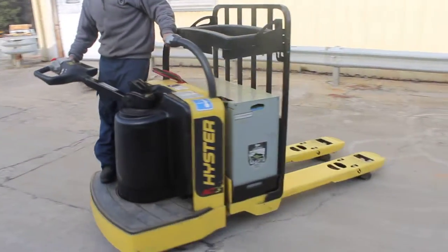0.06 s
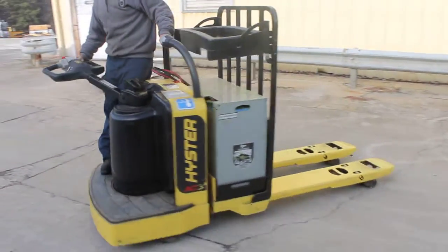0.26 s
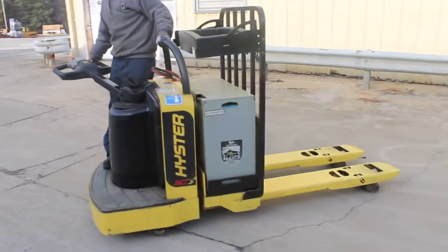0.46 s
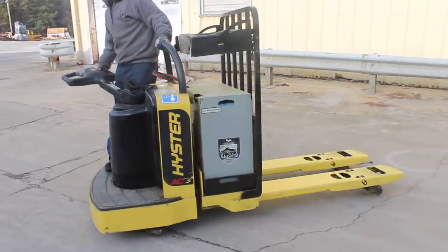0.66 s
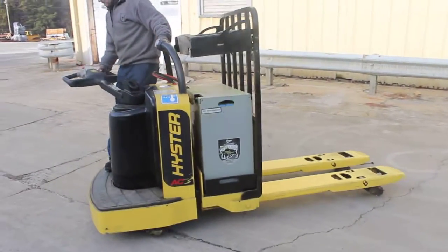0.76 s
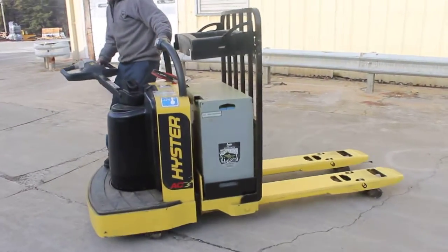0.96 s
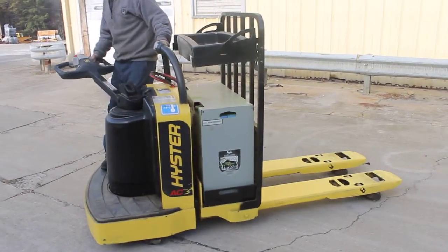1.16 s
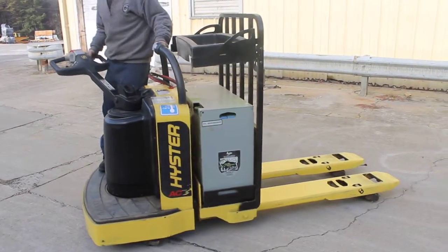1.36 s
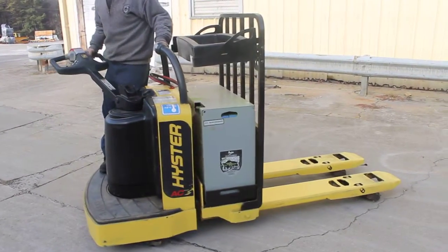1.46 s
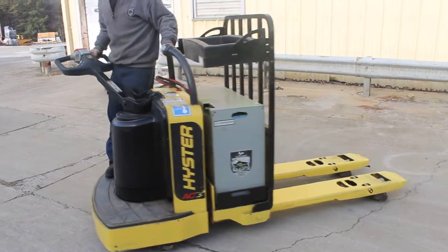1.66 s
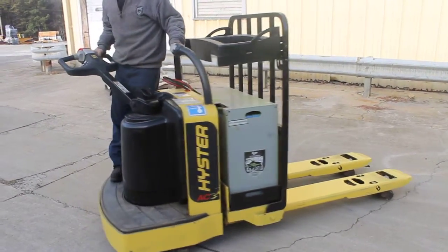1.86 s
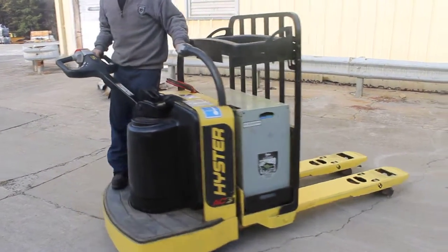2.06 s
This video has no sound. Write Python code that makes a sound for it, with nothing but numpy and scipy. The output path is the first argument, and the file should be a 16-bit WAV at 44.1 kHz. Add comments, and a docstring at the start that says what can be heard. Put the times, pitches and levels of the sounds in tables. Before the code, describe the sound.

Electric pallet jack rolling over cracked concrete, its empty steel forks slamming and rattling with metallic clanks

```python
"""Tyre rumble, a gritty hiss and a faint whine come first, outdoors on cracked concrete, a few metres off.
An electric pallet jack rolls by one microphone: shaped noise for the tyres, wavering tones for the drive.
Wheels thud in the joints and panels shudder: dying tones and noise. The lift linkage clacks, the empty
steel forks slam and the backrest bars jangle: noise bursts and washes over ringing partials."""
import sys
import numpy as np
from scipy import signal
from scipy.fft import rfft, irfft, next_fast_len
from scipy.io import wavfile
from scipy.ndimage import uniform_filter1d, map_coordinates

SR = 44100
rng = np.random.default_rng(int(sys.argv[2]) if len(sys.argv) > 2 else 0)


def transcribe(signal):
    """Save signal, clipped to [-1, 1], as a 16-bit WAV file at the path in sys.argv[1]."""
    frames = np.atleast_2d(signal).T
    limited = np.clip(frames, -1, 1)
    pcm = np.round(limited * 32767).astype(np.int16)
    wavfile.write(sys.argv[1], SR, pcm)


N = 92610
T = np.arange(N) / SR  # time of each sample, s


def amp(db):
    """Decibels to gain."""
    return 10 ** (np.asarray(db) / 20)


def unit(x):
    """x at rms 1."""
    return x / np.sqrt(np.mean(x ** 2) + 1e-20)


def along(points, hz):
    """Interpolate (frequency, value) points on a log frequency axis."""
    f, v = np.transpose(points)
    return np.interp(np.log(hz + 1), np.log(f + 1), v)


def curves(rows):
    """One value per sample for each column after the time."""
    s, *cols = np.transpose(rows)
    return [np.interp(T, s, c) for c in cols]


def wobble(rate, size=N):
    """A smooth random curve, rate knots a second."""
    knots = rng.standard_normal(4096)
    return map_coordinates(knots, [T[:size] * rate], mode="wrap")


def sine(hz, t=T, phase=0):
    """A pure tone, with a phase offset in radians."""
    return np.sin(2 * np.pi * hz * t + phase)


def noise(colour, pitch=1, treble_db=0, size=N):
    """Coloured noise of rms 1, shifted in pitch; treble_db tilts it per tenfold of (1 + kHz)."""
    hz = np.fft.rfftfreq(size, 1 / SR)
    gain = amp(along(colour, hz / pitch) + treble_db * np.log10(hz / 1000 + 1))
    phases = np.exp(2j * np.pi * rng.random(len(hz)))
    return unit(irfft(gain * phases, size))


def envelope(attack, hold, t60, size=N):
    """Rise with time constant attack; after hold, release by 60 dB in t60 (all s)."""
    rise = 1 - np.exp(-T[:size] / attack)
    return rise * amp(-60 * np.maximum(T[:size] - hold, 0) / t60)


def burst(colour, attack, t60, pitch=1, treble_db=0):
    """A short dying burst of coloured noise, scaled to the energy of its envelope."""
    shape = envelope(attack, 0, t60, size=2 ** 13)
    x = noise(colour, pitch, treble_db, size=len(shape)) * shape
    return x * np.linalg.norm(shape) / np.linalg.norm(x)


def ring(modes, attack, blur, flutter_db=0, pitch=1, size=2 ** 15):
    """Dying partials, unsteady in level (flutter_db) and phase (blur, radians)."""
    t = T[:size]
    out = np.zeros(size)
    for hz, db, t60 in modes:
        level = amp(db + flutter_db * wobble(69.7, size))
        out += level * envelope(attack, 0, t60, size) * sine(hz * pitch, t, blur * wobble(86.3, size))
    return out


def add(track, s, x):
    """Mix x into the track at time s."""
    i = max(round(s * SR), 0)
    track[i:i + len(x)] += x[:N - i]


def rattle():
    """Gain of rms near 1 that jumps at each random loose contact and falls back."""
    contacts_per_s, life_s, power_share = 410, 0.004, 0.42
    hits = (rng.random(N) < contacts_per_s / SR) * amp(3.9 * rng.standard_normal(N))
    power = signal.lfilter([1], [1, -np.exp(-1 / (life_s * SR))], hits)
    power = 1 - power_share + power_share * power / power.mean()
    return np.sqrt(power / uniform_filter1d(power, size=1200))  # evens out slow swells


def rolling():
    """Tyres on rough concrete: rumble, roar, steering scrub and a finely crackling hiss, all shaped noise."""
    # Rumble: (time [s], level before its trim [dB])
    rumble_levels = [(0, -47), (.2, -43.5), (.29, -39), (.35, -40.5), (.43, -38.5), (.52, -43.5),
                     (.65, -39.5), (.77, -43), (.86, -29.5), (1.0, -46.5), (1.15, -34.5), (1.3, -45.5),
                     (1.55, -42.5), (1.62, -45.5), (1.8, -47.5), (2.03, -44), (2.1, -37)]
    # Rolling: (time [s], roar level [dB], hiss level before its trim [dB])
    roll_levels = [(0, -34.5, -41), (0.08, -41, -43.5), (0.2, -39.5, -47), (0.31, -38.5, -44.5),
                   (0.42, -37, -45), (0.52, -38.5, -52.5), (0.7, -32, -57), (0.88, -41.5, -70),
                   (1.0, -45, -71.5), (1.1, -43, -56), (1.27, -37, -72), (1.6, -36.5, -72),
                   (1.9, -41, -53.5), (2.1, -41.5, -53)]
    # Tyre scrub while steering: (time [s], level [dB])
    scrub_levels = [(0.22, -85), (0.31, -53), (0.37, -41.5), (0.44, -39), (0.53, -44), (0.62, -100)]
    # Spectra of the four noises: (frequency [Hz], level [dB])
    rumble_colour = [(20, -16), (40, -3), (60, 2), (100, -2.5), (150, -2), (260, -2.5), (500, -26),
                     (1500, -58)]
    roar_colour = [(100, -17), (300, -1.5), (640, -0.5), (850, -5.5), (1200, -5.5), (1700, -9),
                   (2500, -17.5), (4000, -21), (8000, -32), (16000, -51)]
    hiss_colour = [(800, -28), (2500, -10), (5000, 0), (8000, 0), (12000, -1.5), (16000, -4.5)]
    scrub_colour = [(800, -4), (1900, 4), (4300, -4), (7000, -14), (16000, -34)]
    rumble_trim_db, hiss_trim_db = 2.5, -5.5
    (rumble_db,), (scrub_db,) = curves(rumble_levels), curves(scrub_levels)
    roar_db, hiss_db = curves(roll_levels)
    rumble = amp(rumble_db + rumble_trim_db) * noise(rumble_colour)
    roar = amp(roar_db + wobble(57.96)) * noise(roar_colour)
    hiss = amp(hiss_db + hiss_trim_db + 3.9 * wobble(460)) * rattle() * noise(hiss_colour)
    scrub = amp(scrub_db) * rattle() * noise(scrub_colour)
    return rumble + roar + hiss + scrub


def drive():
    """Thin, rough whines of the electric drive swell and fade; one climbs as the motor speeds up."""
    # (frequency at the swell [Hz], peak level [dB], time of swell [s], width [s], glide [Hz per s])
    whines = [(4920, -58, .13, .2, -5), (3390, -52, 2.0, 0.11, 3900)]
    out = np.zeros(N)
    for hz, db, s, width, glide in whines:
        t = T - s
        swell = np.exp(-(t / width) ** 2)
        roughness = hz / 4000 * wobble(220)  # radians
        out += amp(db) * swell * sine(hz + glide * t / 2, t, roughness)
    return out


def body():
    """Wheel knocks boom in the chassis modes, sharp at first; panels shudder as chattering noise."""
    # Wheel knocks on the chassis: (time [s], level [dB], t60 [s], pitch factor)
    knocks = [(0.006, -32, 0.051, 1.72), (0.2149, -22.5, 0.12, 0.94), (0.251, -17.5, 0.046, 1.01),
              (0.262, -26.5, 0.1, 1.07), (0.353, -16, 0.048, 1.01), (0.365, -24.5, 0.065, 0.79),
              (0.423, -29, 0.036, 1.16), (0.628, -16, 0.13, 1.06), (0.648, -17, 0.055, 1.3),
              (0.6885, -11.5, 0.043, 1.18), (0.754, -20, 0.065, 1.08), (0.769, -29, 0.093, 0.87),
              (1.044, -25.5, 0.19, 1.02), (1.167, -27, 0.07, 0.95), (1.18, -24.5, 0.072, 1.04),
              (1.218, -25, 0.04, 1.34), (1.304, -22, 0.24, 1.33), (1.338, -12, 0.04, 1.01),
              (1.343, -7.5, 0.02, 1), (1.362, -14.5, 0.055, 1.2), (1.406, -12, 0.047, 1.8),
              (1.538, -23, 0.073, 0.73), (1.555, -23, 0.1, 1.06), (1.776, -17, 0.055, 1)]
    # Chassis resonances: (frequency [Hz], level [dB], t60 as a multiple of the knock's)
    chassis_modes = [(519.5, -3.5, 0.72), (600.6, -5, 2.74), (664, -9, 1.14), (1006, -12.5, 2.8),
                     (1140, -9, 0.23)]
    # Spectrum of the unpitched thud: (frequency [Hz], level [dB])
    thud_colour = [(50, -31), (150, -19), (380, -19), (520, -8), (615, 5), (705, 0.5), (780, -12.5),
                   (1010, -7.5), (1250, -28), (1900, -21), (2600, -35), (6000, -55), (16000, -49)]
    # Panel shudder after each heavy blow: (time [s], level [dB], hold [s], t60 [s])
    shudders = [(0.606, -19, 0.015, 0.53), (1.335, -20.5, .2, 0.35), (1.708, -19.5, 0.028, 0.35)]
    # Spectrum of the panels: (frequency [Hz], level [dB])
    panel_colour = [(60, -44), (150, -15.5), (220, -12), (300, 1), (390, 0.5), (460, -6), (640, 1.5),
                    (800, -2.5), (1000, -3.5), (1190, -1.5), (1450, -9.5), (1650, -8.5), (2200, -12),
                    (5000, -39), (16000, -74)]
    sag_share, sag_s, thud_db = 0.048, 0.036, -2.5  # initial sharpness, its settling time, thud level
    out = np.zeros(N)
    t = T[:2 ** 13]
    for s, db, t60, pitch in knocks:
        bent_time = pitch * (t + sag_share * sag_s * (1 - np.exp(-t / sag_s)))
        boom = np.zeros(len(t))
        for hz, mode_db, life in chassis_modes:
            boom += amp(mode_db) * envelope(0.00038, 0, life * t60, len(t)) * sine(hz, bent_time)
        add(out, s, amp(db) * boom)
        add(out, s, amp(db + thud_db) * burst(thud_colour, 0.0012, t60, pitch))
    for s, db, hold, t60 in shudders:
        add(out, s, amp(db) * rattle() * envelope(0.00062, hold, t60) * noise(panel_colour))
    return out


def wheels():
    """Sharp noise ticks, dull bumps of low tone, tread slap and puff, and one faint falling squeak."""
    # Ticks: (time [s], level [dB], t60 [s])
    ticks = [(0.009, -30.5, 0.033), (0.123, -43, .015), (0.254, -35, .035), (0.435, -37, 0.033),
             (0.6812, -26.5, 0.024), (0.841, -37, 0.039), (0.971, -46.5, 0.086), (1.039, -42, 0.039),
             (1.2858, -17, 0.0073), (1.313, -25, .04), (1.3404, -23, 0.034), (1.35, -27, 0.043),
             (1.407, -22, 0.038), (1.484, -35, 0.026), (1.553, -34, .05), (1.6455, -14, 0.018),
             (1.915, -40, 0.059)]
    # Spectrum of a tick: (frequency [Hz], level [dB])
    tick_colour = [(1000, 6.5), (4000, 4), (7000, 2), (10000, -6.5), (16000, -14)]
    # Dull tyre bumps: (time [s], level [dB], frequency [Hz], t60 [s])
    bumps = [(0.277, -29, 148, 0.093), (0.717, -27, 125, .08), (0.809, -19, 109, 0.033),
             (0.8196, -18, 149, 0.081), (0.8462, -9, 125, 0.03), (0.867, -4.5, 152, 0.02),
             (0.9093, -12, 225.4, 0.022), (0.922, -24, 197, 0.078), (1.072, -30.5, 240, 0.16),
             (1.108, -23.5, 111, 0.12)]
    # Spectrum of the puff of noise in a bump: (frequency [Hz], level [dB])
    puff_colour = [(40, -18), (130, 4.5), (400, 5), (800, -24), (3000, -60)]
    # Wheel squeak: (time [s], frequency [Hz], level [dB])
    squeak_path = [(0.44, 3250, -68), (0.465, 3030, -37), (0.49, 2600, -64), (0.52, 2360, -34),
                   (0.535, 2330, -39)]
    bump_attack_s, puff_db = 0.0011, -9.5
    slap_db, slap_hz, slap_attack_s, slap_t60 = 3, 354, 0.006, 0.016  # the tread slapping down
    out = np.zeros(N)
    for s, db, t60 in ticks:
        add(out, s, amp(db) * burst(tick_colour, 0.00029, t60))
    hardest_db = max(row[1] for row in bumps)
    for s, db, hz, t60 in bumps:
        add(out, s, amp(db) * envelope(bump_attack_s, 0, t60) * sine(hz))
        slap_level_db = db + slap_db + (db - hardest_db) / 2  # softer bumps slap far less
        add(out, s, amp(slap_level_db) * envelope(slap_attack_s, 0, slap_t60) * sine(slap_hz))
        add(out, s, amp(db + puff_db) * burst(puff_colour, bump_attack_s, t60))
    hz, db = curves(squeak_path)
    sounding = (T > squeak_path[0][0]) & (T < squeak_path[-1][0])
    squeak = np.sin(2 * np.pi * np.cumsum(hz) / SR + 1.2 * wobble(210))
    return out + sounding * amp(db) * squeak


def linkage():
    """Slack joints clack shut as noise bursts over short partials; a loose pin pings after the slams."""
    # Clacks: (time [s], level [dB], ring relative to it [dB], burst t60 [s], pitch factor of the ring)
    clacks = [(0.5403, -18, -3, 0.11, 1.14), (1.028, -35, -2.5, .04, 0.92), (1.044, -32, -7, 0.08, .52),
              (1.139, -30, -10, 0.039, .6), (1.201, -36, 0.5, 0.057, 0.9), (1.212, -32.5, 2, 0.096, 1),
              (1.22, -25.5, -5, 0.075, 1.12), (1.273, -23, -4, 0.064, 0.5), (1.286, -7, -4.5, 0.048, 1.026),
              (1.3128, -15.5, -10.5, 0.06, 1.75), (1.325, -16.5, -13, 0.19, 1.02),
              (1.3401, -11, -9, 0.032, .72), (1.3586, -22.5, 1, 0.03, 1.5), (1.635, -16, -8, 0.17, 1.14),
              (1.659, -19, -12, 0.021, .66), (1.689, -21, -1, 0.017, 0.63)]
    # Spectrum of a clack: (frequency [Hz], level [dB])
    clack_colour = [(100, -45), (300, -18), (700, -27), (1200, 1.5), (1750, 0), (2350, 5.5), (2550, -18),
                    (2850, 7), (3300, -2.5), (4200, -2), (4900, -10.5), (6100, -9.5), (6700, -25.5),
                    (7400, -13), (8000, -26), (16000, -38)]
    # Partials of the linkage: (frequency [Hz], level [dB], t60 [s])
    link_modes = [(1285, -9, 0.029), (1794, -5.5, 0.055), (2262, 4, 0.097), (2906, 2.5, 0.029),
                  (3380, -4.5, 0.031), (3770, -4, 0.032), (4380, -14, 0.1), (5860, -25, 0.044)]
    # Pings of the pin: (time [s], level [dB])
    pings = [(0.722, -26.5), (1.675, -31), (1.698, -20.5), (1.819, -23)]
    # Spectrum of a ping: (multiple of its pitch, level [dB])
    ping_shape = [(.3, -25), (.57, -11.5), (.75, -30), (.92, -19), (1, -2.5), (1.06, -29), (1.15, -34),
                  (3, -51)]
    dull_db_per_db, hard_db = 2.2, -11  # clacks softer than hard_db lose treble
    ping_hz, ping_t60 = 4290, 0.08
    out = np.zeros(N)
    for s, db, ring_db, t60, pitch in clacks:
        treble_db = dull_db_per_db * min(db - hard_db, 0)
        add(out, s, amp(db) * burst(clack_colour, 0.0002, t60, treble_db=treble_db))
        tone = ring(link_modes, attack=0.00071, blur=0.33, pitch=pitch, size=2 ** 13)
        add(out, s, amp(db + ring_db) * tone)
    ping_colour = [(k * ping_hz, db) for k, db in ping_shape]
    for s, db in pings:
        add(out, s, amp(db) * burst(ping_colour, 0.00051, ping_t60))
    return out


def resonant(x):
    """x through the crowded resonances of the forks, of chance strength."""
    peak_db, spacing_hz = 3, 44.9
    hz = np.fft.rfftfreq(N, 1 / SR)
    peaks = map_coordinates(rng.standard_normal(4096), [hz / spacing_hz], mode="wrap")
    return unit(irfft(rfft(x) * amp(peak_db * np.tanh(peaks)), N))


def forks():
    """Each fork crashes down, rattles out with most of the treble dying first, and rings in its modes."""
    # Slams: (time [s], level of wash and crash before their trims [dB],
    # treble tilt of the wash [dB per tenfold of (1 + kHz)], length factor of the wash)
    slams = [(0.548, -13, -6, 0.88), (1.644, -15, -7, 1.12)]
    # Spectrum of a slam: (frequency [Hz], level [dB])
    slam_colour = [(60, -40), (150, -26), (270, -9), (430, -27), (620, -6.5), (780, -12.5), (1200, -3.5),
                   (1500, -4.5), (1850, -6.5), (2280, -5.5), (2540, -10.5), (2800, -5), (3750, -9.5),
                   (4300, -8.5), (4850, -16), (5450, -9), (6700, -19), (7300, -20.5), (11000, -28),
                   (16000, -40)]
    # Decay of the wash before the length factor: (frequency [Hz], t60 [s])
    slam_decay = [(200, 1), (1400, 0.57), (2800, 0.6), (4300, 0.5), (6000, 0.4), (14000, 0.4)]
    # Modes of the fork that slams first, then of the other: (frequency [Hz], level [dB], t60 [s])
    first_modes = [(802, -26, 0.91), (956, -28.5, 0.68), (1225, -18, 0.17), (1315, -15, 0.25),
                   (1570, -22, 0.55), (1630, -26, 0.47), (1794, -32, 0.34), (2370, -31, 0.68),
                   (2595, -37, 0.77), (3120, -25, 0.3), (4280, -28.5, 0.52), (5448, -28, 0.24),
                   (8600, -43, 0.29), (14700, -44, 0.34)]
    second_modes = [(944, -23, 0.43), (1228, -19.5, 0.25), (1287, -24, 0.62), (1406, -21, 0.4),
                    (1470, -19, 0.67), (1522, -23, 0.39), (1932, -7.5, 0.035), (2270, -19, 0.24),
                    (2840, -28, 0.34), (3350, -11.5, 0.05), (4230, -31, 0.6), (5750, -44, 0.28),
                    (8600, -28.5, 0.074)]
    wash_db, crash_db, crash_t60 = -1.0, 3, 0.031
    out = np.zeros(N)
    for (s, db, treble_db, length), modes in zip(slams, (first_modes, second_modes)):
        # each frequency band of the wash dies at its own rate
        hz, t, bands = signal.stft(resonant(noise(slam_colour, treble_db=treble_db)), SR, nperseg=256)
        fade = amp(-60 * t / (length * along(slam_decay, hz)[:, None]))
        wash = signal.istft(bands * fade, SR, nperseg=256)[1][:N] * rattle()
        add(out, s, amp(db + wash_db) * wash)
        add(out, s, ring(modes, attack=0.00038, blur=0.68, flutter_db=3.0))
        add(out, s, amp(db + crash_db) * burst(slam_colour, 0.00039, crash_t60))
    return out


def backrest():
    """Loose steel bars are struck, chatter and sing while shaken, then die away."""
    # Ringing bars: (frequency [Hz], level before the trim [dB])
    bar_modes = [(1626, -32), (1809, -32), (2323, -29), (2697, -25.5), (3005, -27), (3069, -35),
                 (3418, -25.5), (3592, -29), (3852, -28.5), (4041, -27.5), (4990, -39)]
    # Spectrum of the clatter: (frequency [Hz], level [dB])
    jangle_colour = [(600, -16), (1600, 2), (2100, -24), (2420, 8), (2800, -1.5), (3050, 10), (3250, 0),
                     (3450, 6.5), (3900, 3.5), (4500, -9), (6000, -15.5), (8000, -25), (16000, -46)]
    start_s, hold_s, t60 = 1.358, 0.13, 0.27
    clatter_db, bars_trim_db = -23.5, -2.5
    kick_db, kick_s = 4, 0.013  # extra level of the first strike, and its life
    bars = np.zeros(N)
    for hz, db in bar_modes:
        bars += amp(db + 2 * wobble(45)) * sine(hz, phase=0.8 * wobble(45))
    kick = kick_db * np.exp(-T / kick_s)
    clatter = amp(clatter_db + kick) * rattle() * noise(jangle_colour)
    out = np.zeros(N)
    add(out, start_s, (clatter + amp(bars_trim_db) * bars) * envelope(0.0005, hold_s, t60))
    return out


def scene():
    """The whole machine at one microphone."""
    machine = rolling() + drive() + body() + wheels() + linkage() + forks() + backrest()
    return machine[None]


def record(dry):
    """The recorder thins the deep bass, rounds off the highest peaks and keeps nothing above its band limit."""
    low_cut_hz, top_hz, ceiling = 67, 15850, 0.8
    x = signal.sosfilt(signal.butter(2, low_cut_hz, "highpass", fs=SR, output="sos"), dry)
    x = x / (1 + np.abs(x / ceiling) ** 6) ** (1 / 6)
    size = next_fast_len(N + SR // 4)
    in_band = np.fft.rfftfreq(size, 1 / SR) < top_hz
    return irfft(rfft(x, size) * in_band, size)[:, :N]


dry = scene()
out = record(dry)
transcribe(out)
```